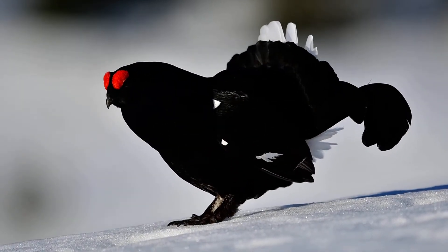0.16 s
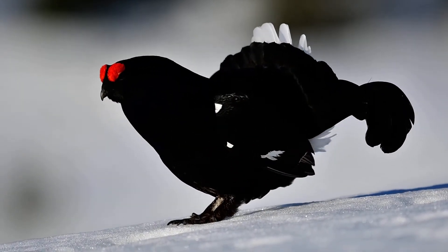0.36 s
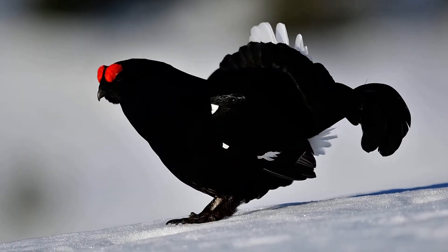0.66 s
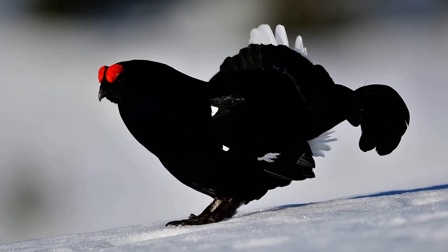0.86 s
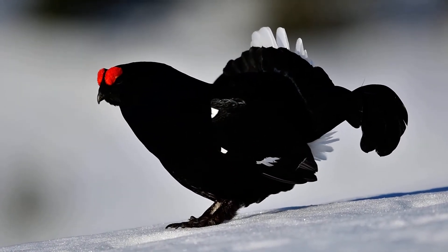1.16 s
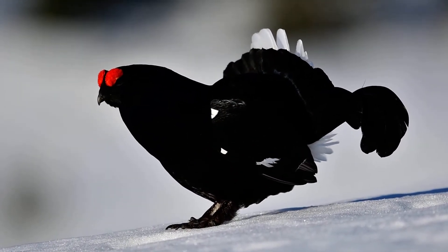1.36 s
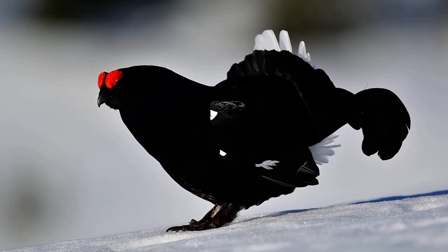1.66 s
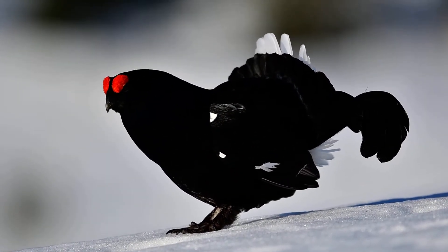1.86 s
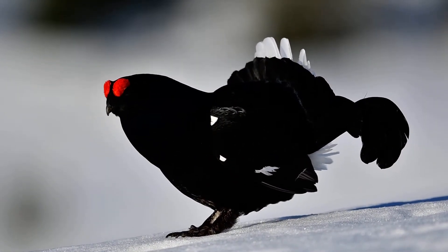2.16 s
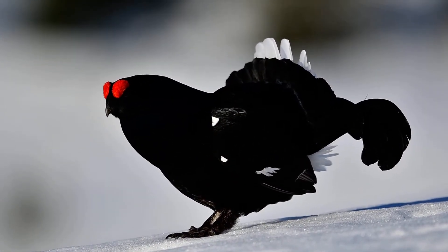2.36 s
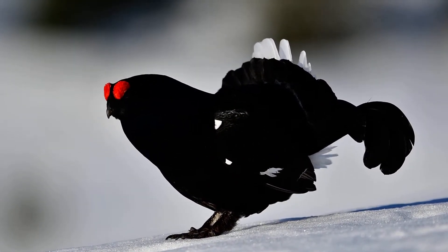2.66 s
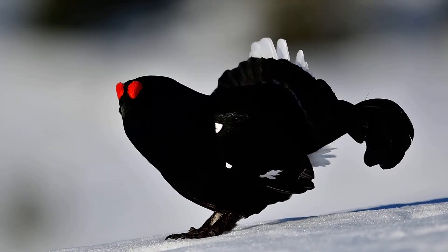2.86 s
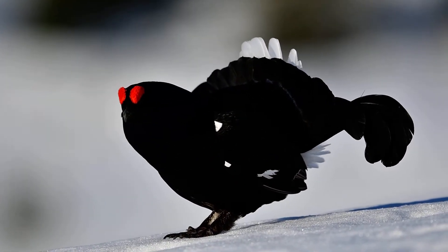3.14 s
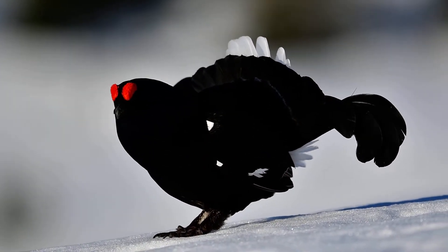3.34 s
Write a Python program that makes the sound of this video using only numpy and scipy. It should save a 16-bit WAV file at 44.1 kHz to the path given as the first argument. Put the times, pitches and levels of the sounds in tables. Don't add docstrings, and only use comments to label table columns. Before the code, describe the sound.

Close outdoor stereo pickup of a displaying grouse: smooth arching coos, a softer rolling middle, a higher climax and another phrase. Distant cocks coo lower, a thin bird chips early, and tiny crust snaps click.

```python
import sys
import numpy as np
from scipy import signal
from scipy.fft import rfft, irfft
from scipy.io import wavfile
from scipy.ndimage import uniform_filter1d

SR = 44100
rng = np.random.default_rng(int(sys.argv[2]) if len(sys.argv) > 2 else 0)


def pcm_store(signal):
    levels = np.round(np.clip(np.atleast_2d(signal), -1, 1) * 32767)
    wavfile.write(sys.argv[1], SR, levels.astype(np.int16).T)


def ratio_of_db(decibels):
    return 10 ** (np.asarray(decibels, float) / 20)


N = 154350


def evened(x):
    return x / np.sqrt(np.mean(x ** 2) + 1e-20)


def read(points, hz):
    f, value = np.transpose(points)
    return np.interp(np.log(hz + 1), np.log(f + 1), value)


def add(mix, s, sound):
    at = round(s * SR)
    sound = sound[..., max(-at, 0):]
    part = mix[..., max(at, 0):][..., :sound.shape[-1]]
    part += sound[..., :part.shape[-1]]


def slow(size, span):
    noise = rng.standard_normal(size + 2000)
    drift = evened(uniform_filter1d(uniform_filter1d(noise, span), span))
    return drift[1000:1000 + size]


def quarter_sine(x):
    return np.sin(np.pi / 2 * np.clip(x, 0, 1))


def air():
    # (frequency [Hz], density [dB per Hz])
    hum_curve = [(12, -41), (20, -14), (27, -62), (80, -19), (135, -3.5), (324, -0.5), (340, -6),
                 (440, -29), (750, -120)] + [(520, -4), (700, -61), (1200, -49)]
    # (frequency [Hz], density [dB per Hz])
    hiss_curve = [(300, -6), (700, 5.5), (1300, -3), (2100, -8.5), (3500, -7), (5200, -6.5), (9000, -8.5),
                  (15500, -17)]
    # (centre [Hz], width [Hz], level [dB])
    hollows = [(920, 170, -80), (1350, 108, -68.5), (1696, 13, -75.5), (1990, 142, -72.5), (5570, 390, -82)]
    # (frequency [Hz], coherence [0..1])
    likeness = [(30, .99), (130, .998), (250, .994), (600, .99), (750, .4), (1000, .42), (1900, .52),
                (2500, .15), (5000, .15)]
    # (frequency [Hz], left over right [dB])
    lean = [(500, 0), (840, 2.5), (1050, -2), (1300, -5), (1900, -6), (2300, -1.5), (5000, 2), (6500, -1),
            (9000, 3), (11000, 0)]
    # (middle [s], length [s], centre [Hz], width [Hz], level [dB])
    rustles = [(0.026, 0.019, 2030, 230, -67.5), (0.21, 0.04, 2030, 170, -68.5),
               (4.3, 0.033, 1240, 44, -65), (3.185, 0.11, 1240, 340, -69), (3.29, 0.027, 940, 130, -69)]
    hum_db, hiss_db, right_lag_s = -70, -62.5, 0.0002825

    frames, hz = N // 256 + 5, np.fft.rfftfreq(1024, 1 / SR)
    a, b, c, d, patches = rng.standard_normal((frames, 513, 5)).T
    patches = evened(uniform_filter1d(uniform_filter1d(patches, 5, 0), 24, 1))
    patch_db = read([(500, 1.2), (1400, 1.6), (3000, 1.34), (10000, 0.37)], hz)

    hum = ratio_of_db(read(hum_curve, hz)) ** 2
    hiss = ratio_of_db(read(hiss_curve, hz)) ** 2
    power = ratio_of_db(2 * hum_db) * hum / hum[:8].sum() + ratio_of_db(2 * hiss_db) * hiss / hiss[:370].sum()
    for f, width, db in hollows:
        bump = np.exp(-.5 * ((hz - f) / width) ** 2)
        power = power + ratio_of_db(2 * db) * bump / bump.sum()

    same = np.clip(read(likeness, hz), -1, 1)[:, None]
    left, own = a + 1j * b, c + 1j * d
    lag = np.exp(-2j * np.pi * right_lag_s * np.maximum(hz - 500, 0))[:, None]
    z = np.array([left, same * left * lag + np.sqrt(1 - same ** 2) * own])
    z = z * np.sqrt(power)[:, None] * ratio_of_db(patches * patch_db[:, None])

    t = np.arange(frames) * 256 / SR
    for s, length, f, width, db in rustles:
        spot = np.exp(-.5 * ((hz[:, None] - f) / width) ** 2 - .5 * ((t - s) / length) ** 2)
        z = z * np.sqrt(1 + ratio_of_db(2 * db) * spot * (hz[1] / width) / power[:, None])
    z = z * ratio_of_db(np.array([.5, -.5])[:, None, None] * read(lean, hz)[:, None])
    sound = signal.istft(z, nperseg=1024, noverlap=768)[1][:, :N]
    return np.sqrt(power.sum()) * evened(sound)


def whine():
    # (multiple of the base pitch, level [dB])
    overtones = [(2, -94), (3, -92), (4, -90), (5, -92), (9, -96), (10, -97), (11, -99), (12, -101)]
    base_hz, t = 1170.3, np.arange(N) / SR
    out = np.zeros(N)
    for k, db in overtones:
        out += np.sqrt(2) * ratio_of_db(db) * np.sin(2 * np.pi * (k * base_hz * t + rng.random()))
    return out


SAC_HZ = 497.7


def coo(start, length, effort_db, from_hz, top_hz, end_hz=462, attack=None, tilt=1):
    t = np.arange(0, length, 1 / SR)
    rise_share = 0.448
    rise_s, fall_s = (0.0285, 0.04) if length < .12 else (0.0246, 0.036)
    rises = top_hz > 1.03 * from_hz
    rise = min(rise_share * length, rise_s) if rises else 0
    fall = min((1 - rise_share) * length, fall_s) if rises else length
    held = np.clip((length - rise - fall) / 0.06, 0, 1)

    up, down = quarter_sine(t / (rise + 1e-4)), quarter_sine((length - t) / fall)
    hz = top_hz - (top_hz - from_hz) * (1 - up) - (top_hz - end_hz) * (1 - down)
    overshoot_hz = 54 * np.exp(-((t - rise) / 0.01) ** 2)
    wobble_hz = 10.2 * slow(8000, span=300)[:len(t)]
    lift_hz = 25.3 * np.exp(-((length - fall - t) / 0.032) ** 2)
    hz = hz + held * (overshoot_hz + wobble_hz + lift_hz)

    lean_db = -0.0266 * np.maximum(hz - SAC_HZ, 0) + 6 * (1 - down)
    waver_db = slow(8000, span=200)[:len(t)]
    sag_db = -7.5 * np.exp(-((t / length - .62) / 0.19) ** 2)
    db = effort_db + tilt * lean_db + waver_db + held * sag_db

    attack = attack or (0.0066 if rises else 0.28 * length)
    release = 0.011
    edge = quarter_sine(np.minimum(t / attack, (length - t) / release)) ** 2
    tone = np.sin(2 * np.pi * (np.cumsum(hz) / SR + rng.random()))
    return start, np.sqrt(2) * ratio_of_db(db) * edge * tone


def sac(x):
    width_hz, ring_db = 62.7, 3
    b, a = signal.iirpeak(SAC_HZ, SAC_HZ / width_hz, SR)
    return x + ratio_of_db(ring_db) * signal.lfilter(b, a, x)


def near_cock():
    # (start [s], length [s], effort [dB], onset pitch [Hz], top
    # pitch [Hz])
    phrase_notes = [
        (0.001, 0.0712, -48, 465, 652),
        (0.099, 0.055, -50, 504.5, 620),
        (0.187, 0.15, -46.5, 446, 604),
        (.457, 0.043, -46, 506, 599),
        (0.554, 0.024, -48.5, 640, 629),
        (0.706, 0.062, -43, 500, 644.6),
        (0.788, 0.046, -47, 458, 632.6),
        (0.871, 0.045, -48.5, 650, 620),
                    (2.569, 0.046, -50.5, 710, 695),
        (2.649, 0.023, -50, 660, 640),
        (2.911, 0.072, -50, 547, 632),
        (3.159, 0.071, -49, 413, 621),
        (3.259, 0.052, -49.5, 533, 600),
        (3.347, 0.15, -47, 441, 587.6),
    ]
    # (start [s], length [s], effort [dB], onset pitch [Hz], end pitch [Hz])
    glides = [(.434, 0.024, -46.5, 584, 508), (0.52, 0.017, -47, 475, 600), (.617, 0.033, -40.5, 629, 583),
              (.842, 0.025, -59, 526, 644), (1.095, 0.036, -47.5, 657, 493), (1.124, .026, -59, 472, 386),
              (1.158, 0.023, -58, 464, 540), (1.225, 0.054, -70, 477, 420), (1.505, 0.048, -68, 482, 500),
              (2.03, 0.035, -67, 503, 535), (2.092, .045, -69.5, 464, 533), (2.168, 0.019, -62, 539, 554),
              (2.232, 0.02, -68, 522, 565), (2.305, 0.013, -63, 535, 550), (2.427, 0.043, -51.5, 586, 458),
              (2.497, 0.053, -49.5, 647, 462), (2.725, 0.027, -65, 510, 510), (2.99, 0.029, -65, 503, 490),
              (3.123, 0.035, -63, 491, 514), (3.045, 0.021, -51, 663, 644), (3.054, .028, -46.5, 636, 515),
              (3.374, 0.018, -51, 525, 470)]
    out = np.zeros(N)
    for row in phrase_notes:
        add(out, *coo(*row))
    for start, length, db, from_hz, end_hz in glides:
        add(out, *coo(start, length, db, from_hz, from_hz, end_hz, attack=0.011, tilt=0.35))
    return sac(out)


def rolling_coos():
    # (start [s], length [s], effort [dB], pitch [Hz])
    run_up = [(.672, 0.014, -56.5, 535), (1.0, 0.032, -59.5, 536), (1.065, 0.02, -57.5, 555),
              (1.305, 0.023, -58, 555), (1.388, 0.025, -56, 528), (1.634, 0.026, -46, 544),
              (1.655, 0.039, -57.5, 443), (1.7, 0.034, -54.5, 496), (1.775, 0.049, -62.5, 469),
              (1.848, 0.031, -59.5, 486), (1.915, 0.037, -55, 512), (1.973, 0.0515, -54.5, 529),
              (2.059, 0.029, -50.5, 525), (2.136, 0.024, -52.5, 516), (2.208, 0.022, -54, 474),
              (2.28, 0.034, -61, 467), (2.357, 0.032, -51.5, 498)]
    # (start [s], length [s], level [dB], pitch [Hz])
    low_coos = [(0.297, 0.037, -63, 372), (0.376, 0.03, -60, 373), (0.632, 0.034, -60.5, 367),
                (0.664, 0.023, -71, 373), (0.853, 0.061, -62, 372), (0.976, .04, -69, 365),
                (1.332, 0.03, -69, 379), (1.395, 0.083, -60, 358), (1.45, 0.059, -68, 352),
                (1.597, 0.051, -62.5, 363), (1.804, 0.026, -64, 356), (1.86, 0.03, -58, 383),
                (2.03, .035, -58, 393), (2.095, 0.038, -58, 377), (2.216, 0.043, -60, 359),
                (2.338, 0.058, -65, 379), (2.427, .05, -64, 373), (2.595, 0.017, -59, 370),
                (2.989, 0.065, -61, 371), (3.07, 0.057, -61, 363)]
    out = np.zeros(N)
    for start, length, db, hz in run_up:
        add(out, *coo(start, length, db, hz, hz, end_hz=430))
    for start, length, db, hz in low_coos:
        add(out, *coo(start, length, db - 2.5, hz, hz, 0.96 * hz, attack=.012, tilt=0))
    return out


def rivals():
    per_s, murmur_db, low_hz, high_hz = 60, -71, 430, 570
    drone_hz, drone_db = 366, -73
    out = np.zeros(N)
    draws = rng.random((round(N / SR * per_s), 4))
    for k, (late, size, pitch, long) in enumerate(draws):
        hz = low_hz + pitch * (high_hz - low_hz)
        length = 0.0263 + 0.016 * long
        add(out, *coo((k + late) / per_s, length, murmur_db + 5 * size, hz, hz, 0.873 * hz))
    drone = np.sin(2 * np.pi * np.cumsum(drone_hz + 10 * slow(N, span=700)) / SR)
    return out + ratio_of_db(drone_db + 3 * slow(N, span=900)) * drone


def crust_ticks():
    # (time [s], peak level [dB], ring pitch [Hz], left over right [dB], ring time [s])
    snaps = [(.0254, -47, 2100, -10, .001), (.0241, -42, 3400, -9, .0015), (.0246, -48, 4300, -3, .0012),
             (.29365, -31, 5000, 8, .0012), (.2945, -35, 6200, 6, .0012), (.2938, -41, 11200, 9, .0005),
             (.2939, -42, 9600, 9, .0006), (.2938, -42, 8000, 9, .0005), (2.4462, -48, 6900, 3, .0015),
             (2.446, -51, 9200, 3, .0006), (2.4765, -46, 6400, 3, .0006), (2.4765, -48, 8800, 3, .0005),
             (2.4908, -43, 4900, 3, .001), (2.491, -48, 3600, 3, .0007), (2.486, -53, 6300, 0, .0008),
             (2.4935, -53, 6000, 0, .0008), (2.505, -54, 6000, 0, .001), (2.53, -52, 6000, 0, .0007),
             (2.539, -52, 9000, 0, .0008), (2.972, -52, 1100, 0, .006), (3.135, -57, 4500, 0, .0015)]
    out, t = np.zeros((2, N)), np.arange(600) / SR
    for s, db, hz, left_db, ring in snaps:
        side_db = np.array([[.5], [-.5]]) * left_db
        decay = ratio_of_db(db + side_db - 60 * t / (3 * ring))
        add(out, s, decay * np.minimum(t / .0002, 1) * np.sin(2 * np.pi * hz * t))
    return out


def small_bird():
    # (start [s], level [dB], right over left [dB])
    chips = [
        (.102, -72, 1),
        (.324, -71, 3),
        (.535, -65.5, 1),
        (.749, -65, 1),
        (.955, -70, 0),
        (1.158, -69, 2),
        (1.358, -72, 5),
        (1.544, -77, 6),
        (1.933, -77, 5),
    ]
    length_s, sink_hz_per_s = .038, 300
    out, t = np.zeros((2, N)), np.linspace(0, 1, round(length_s * SR))
    for s, db, right_db in chips:
        hz = np.interp(t, [0, .35, .72, 1], [4150, 4660, 5010, 6000])
        hz = hz - sink_hz_per_s * max(s - .8, 0)
        level = ratio_of_db(db + np.array([[-.5], [.5]]) * right_db) * ratio_of_db(2 * slow(len(t), span=120))
        swell = 1.4 * np.sin(np.pi * t ** 1.5)
        add(out, s, level * swell * np.sin(2 * np.pi * np.cumsum(hz) / SR))
    return out


def field(x, t60=0.4):
    t = np.arange(SR // 2) / SR
    hits = rng.standard_normal((2, len(t))) * (rng.random((2, len(t))) < .03)
    taps = hits * ratio_of_db(-60 * t / t60) * (t > .006)
    taps = np.array([taps[0], 0.92 * taps[0] + 0.4 * taps[1]])
    return signal.fftconvolve(x[None], taps / np.linalg.norm(taps[0]), axes=1)[:, :N]


def scene():
    cock, far, bird = near_cock() + rolling_coos(), rivals(), small_bird()
    echoes = field(ratio_of_db(-21) * cock + ratio_of_db(-1.0) * far) + ratio_of_db(-11) * field(bird[0], 0.23)
    return cock + far + bird + echoes + crust_ticks() + air() + whine()


def low_pass(x):
    return signal.sosfilt(signal.butter(12, 16290, fs=SR, output="sos"), x)


def record(dry):
    # (centre [Hz], width [Hz])
    notches = [
        (2600, 466),
        (7710, 1400),
    ]
    edge_hz, offset = 15730, .0001
    for hz, width in notches:
        dry = signal.lfilter(*signal.iirnotch(hz, hz / width, SR), dry)
    both = np.concatenate([dry, dry[:, ::-1]], axis=1)
    passed = np.fft.rfftfreq(2 * N, 1 / SR) < edge_hz
    limited = irfft(rfft(both) * passed, 2 * N)[:, :N]
    fade = np.minimum(np.arange(N, 0, -1) / 100, 1)
    return low_pass(limited * fade + offset)


dry = scene()
out = record(dry)
pcm_store(out)
```